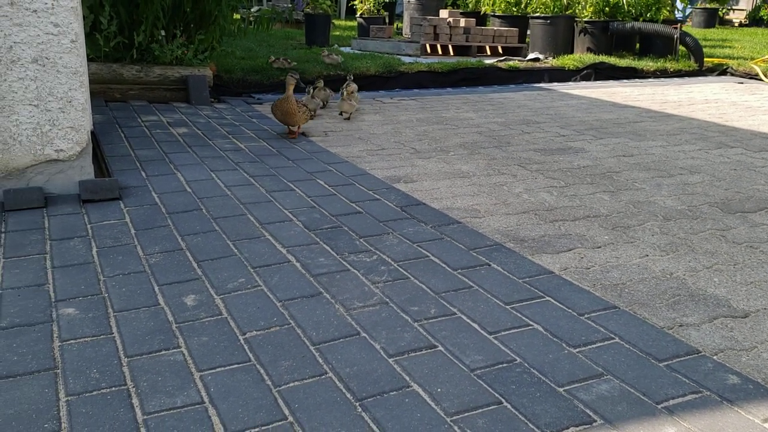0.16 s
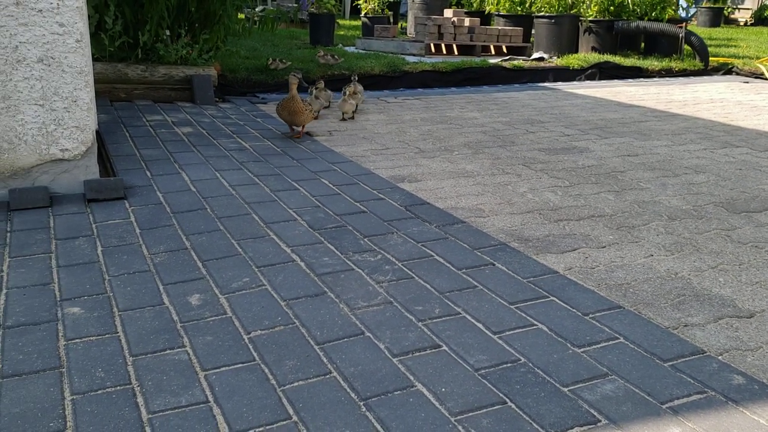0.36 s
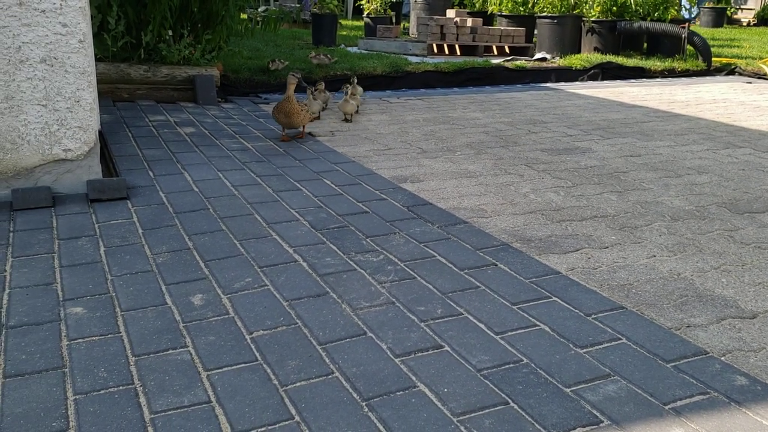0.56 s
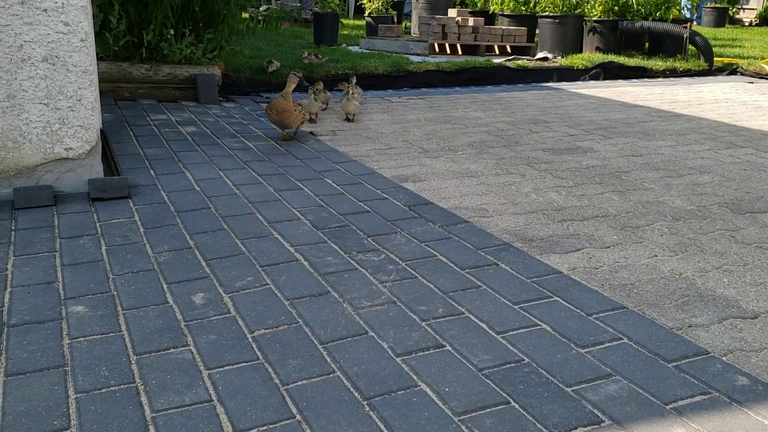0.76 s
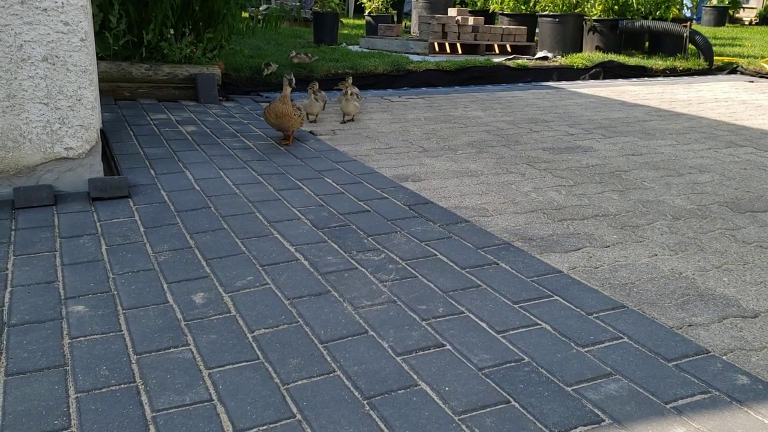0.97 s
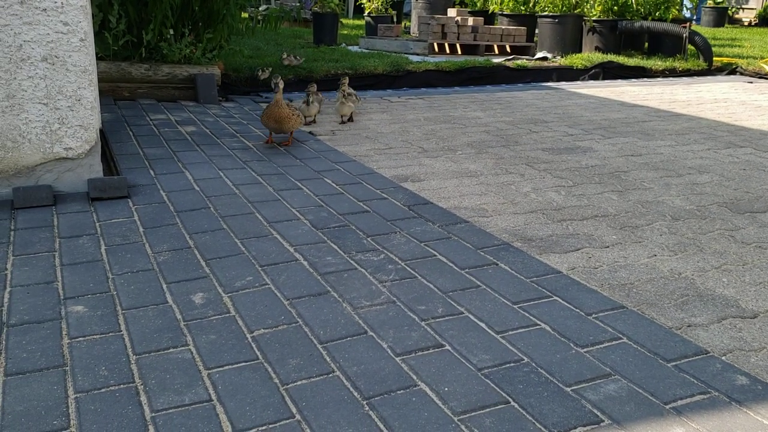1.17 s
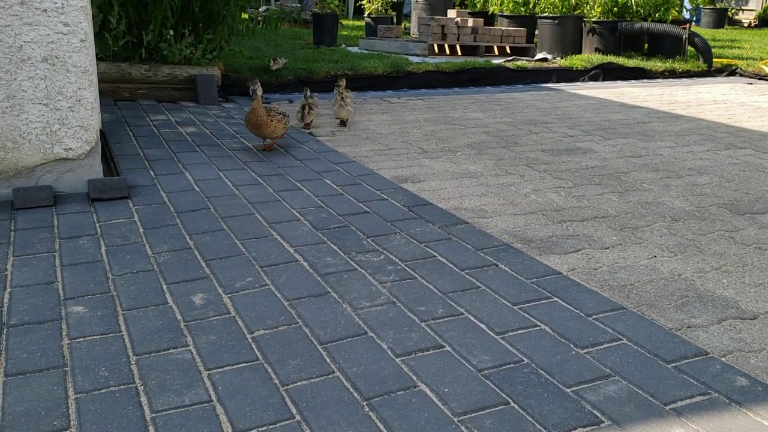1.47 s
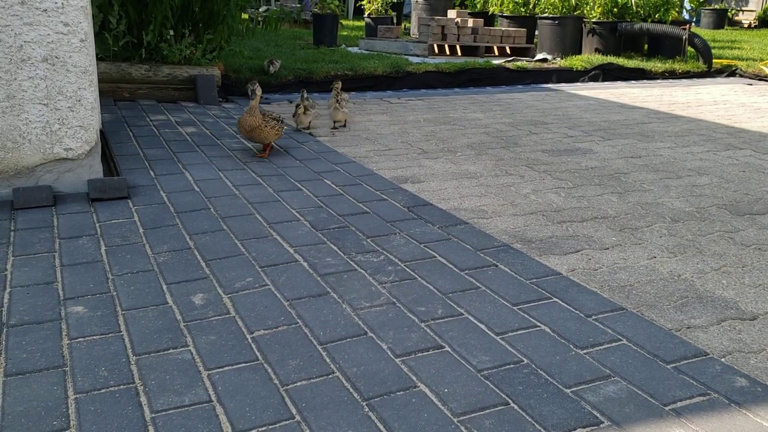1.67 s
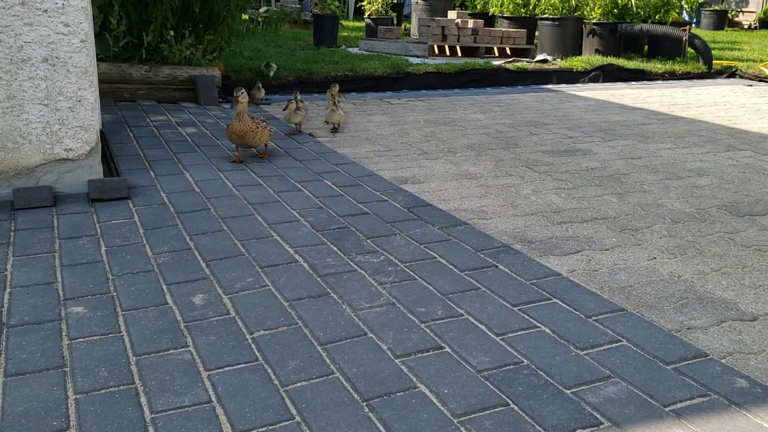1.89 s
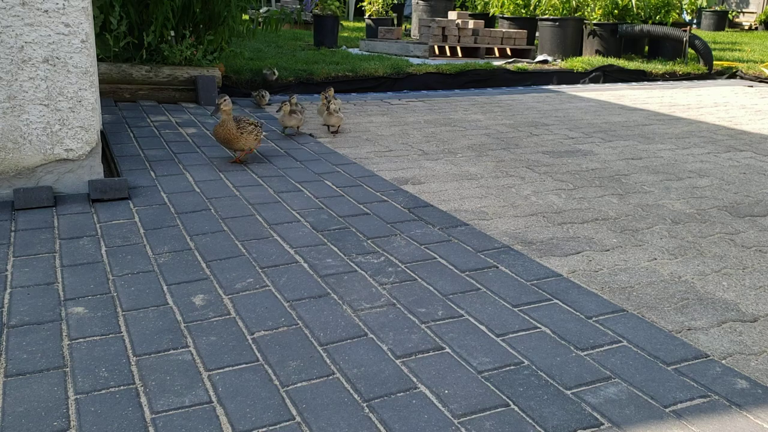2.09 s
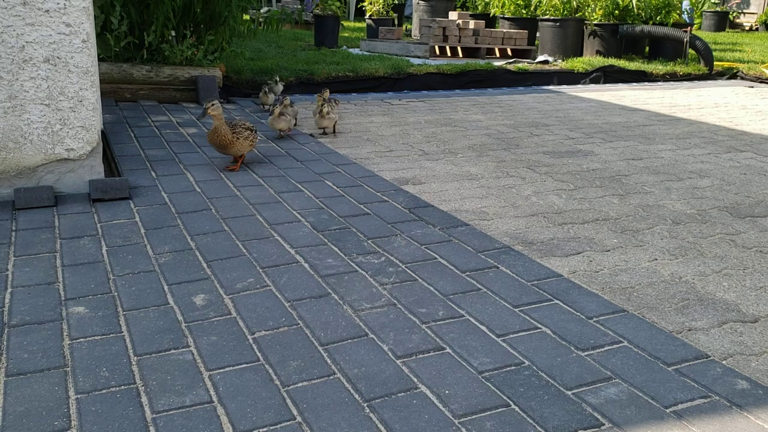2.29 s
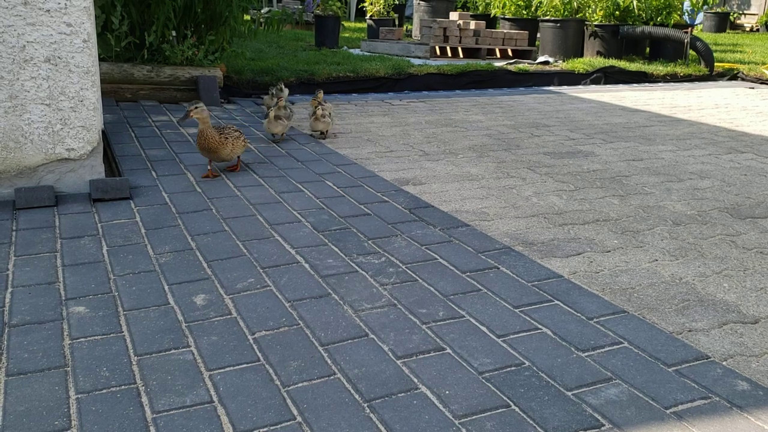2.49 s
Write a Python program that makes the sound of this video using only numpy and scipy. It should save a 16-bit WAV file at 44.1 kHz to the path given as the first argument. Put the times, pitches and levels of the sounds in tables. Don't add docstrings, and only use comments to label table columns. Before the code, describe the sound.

Duckling peeps, short, high and fluttering downward, come at about one and again past two seconds, the second louder, over a steady low machine drone in a paved yard, with faint dry rustling near the phone microphone.

```python
import sys
import numpy as np
from scipy import signal
from scipy.fft import rfft, irfft
from scipy.io import wavfile
from scipy.ndimage import uniform_filter1d

SR = 44100
rng = np.random.default_rng(int(sys.argv[2]) if len(sys.argv) > 2 else 0)


def persist_wave(psi):
    counts = np.round(np.clip(psi, -1, 1) * 32767).astype(np.int16)
    wavfile.write(sys.argv[1], SR, np.atleast_2d(counts).T)


def ratio_of_db(decibels):
    return 10 ** (np.asarray(decibels, float) / 20)


N = 116865


def evened(x):
    return x / np.sqrt(np.mean(x ** 2) + 1e-20)


def read(points, hz):
    f, value = np.transpose(points)
    return np.interp(np.log(hz + 1), np.log(f + 1), value)


def shaped(x, gain):
    return irfft(rfft(x) * gain(np.fft.rfftfreq(N, 1 / SR)), N)


def add(mix, start_s, sound):
    part = mix[..., round(start_s * SR):][..., :sound.shape[-1]]
    part += sound[..., :part.shape[-1]]


def drift(count, size):
    once = uniform_filter1d(rng.standard_normal(count), size)
    return evened(uniform_filter1d(once, size))


def opposed(lean_db):
    return ratio_of_db(lean_db / 2 * np.array([[1], [-1]]))


# (frequency [Hz], correlation [0-1])
PORT_LIKENESS = [(30, .25), (60, .62), (130, .92), (260, .87), (500, .45), (1000, .2), (1700, .2),
                 (3000, .05)]
# (frequency [Hz], left over right [dB])
PORT_LEAN = [(30, 4), (60, 0), (130, -4), (290, 1.4), (640, -9), (1410, 3.4), (3100, 5.5), (15000, 0)]
PORT_LAG_S = .00041


def wide(colour, patchy_db):
    frames, hz = N // 512 + 5, np.fft.rfftfreq(2048, 1 / SR)
    a, b, c, d, patches = rng.standard_normal((frames, 1025, 5)).T
    patches = uniform_filter1d(patches, size=14, axis=0)
    patches = evened(uniform_filter1d(patches, size=6, axis=1))
    same = np.clip(read(PORT_LIKENESS, hz), 0, 1)[:, None]
    right = a + 1j * b
    left = same * right + np.sqrt(1 - same ** 2) * (c + 1j * d)
    left = left * np.exp(2j * np.pi * hz * PORT_LAG_S)[:, None]
    lean = ratio_of_db(read(PORT_LEAN, hz) / 2)[:, None]
    z = np.array([left * lean, right / lean]) * ratio_of_db(patchy_db * patches)
    noise = signal.istft(z, nperseg=2048, noverlap=1536)[1][:, :N]
    return shaped(noise, colour)


# (frequency [Hz], density [dB per Hz])
WASH = [(2400, -10), (3400, -14), (5200, -21.5), (6600, -21.5), (8300, -29), (10000, -23), (12000, -15.5),
        (15600, -14)]


def hiss():
    level_db, low_hz = -71.5, 2400
    return ratio_of_db(level_db) * evened(wide(lambda f: ratio_of_db(read(WASH, f)) * (f >= low_hz), patchy_db=1.6))


# (time [s], level [dB])
LOAD = [(0, -10), (.15, 0), (.4, 0), (.7, 0), (1.0, 1), (1.35, 0), (1.55, 0.5), (1.75, 0.5), (2.0, 0),
        (2.45, 0.72), (2.65, 0)]
# (frequency [Hz], density [dB per Hz])
RUMBLE = [(22, -46), (45, -4.5), (180, -8.5), (300, -15.5), (500, -23), (1150, -28.5), (1350, -33.5),
          (2400, -43.5)]
# (centre [Hz], width [Hz], level [dB])
RESONANCES = [(60.4, 36, -53.5), (109, 9.3, -54), (135, 27, -59), (161, 8.3, -59), (261.7, 10, -62),
              (361.4, 18.6, -60.5), (638.6, 5, -72), (1696, 280, -70.5)]
# (order [multiple of shaft rate], level [dB])
MOTOR_ORDERS = [(8, -75.5), (11, -73), (12, -94.5), (13, -86.5), (14, -81.5), (15, -75.5), (16, -79.5),
                (17, -80), (18, -68.5), (23, -85.5), (25, -75), (26, -84.5), (27, -77.5), (32, -82.5)]


def drone():
    rumble_db, motor_hz, wander = -47.5, 59.36, 0.0009
    panel_follow, all_follow = 6.3, 0.22
    load_db = np.interp(np.arange(N) / SR, *np.transpose(LOAD))
    rumble = wide(lambda f: ratio_of_db(read(RUMBLE, f)) * (f < 2400) * (f > 15), patchy_db=1.7)
    out = ratio_of_db(rumble_db) * evened(rumble)

    base = wide(np.ones_like, patchy_db=3.46)
    for hz, width_hz, db in RESONANCES:
        hump = evened(shaped(base, lambda f: 1 / (1 + ((f - hz) / width_hz * 2) ** 2)))
        out += ratio_of_db(db + panel_follow * load_db * (hz < 150)) * hump

    turns = np.cumsum(motor_hz * (1 + wander * drift(count=N, size=6000))) / SR
    for order, db in MOTOR_ORDERS:
        hz = order * motor_hz
        port_delay = np.array([[0], [hz * PORT_LAG_S]])
        phase = 2 * np.pi * (order * turns + 0.29 * rng.random() - port_delay)
        level = np.sqrt(2) * ratio_of_db(db + 2 * drift(count=N, size=3000))
        out += level * opposed(read(PORT_LEAN, hz)) * np.sin(phase)
    return out * ratio_of_db(all_follow * load_db)


# (time [s], level [dB])
FOOT_TAPS = [
    (.803, -47),
    (2.075, -52),
]
# (frequency [Hz], gain [dB])
FOOT_COLOUR = [(300, -23), (800, 14), (3500, -10.5), (6000, -35)]


def knocks():
    decay_s = 0.0024
    out, t = np.zeros((2, N)), np.arange(600) / SR
    for start_s, db in FOOT_TAPS:
        add(out, start_s, ratio_of_db(db) * rng.standard_normal((2, 600)) * np.exp(-t / decay_s))
    return shaped(out, lambda f: ratio_of_db(read(FOOT_COLOUR, f)))


# (start [s], length [s], level [dB])
STIR_EVENTS = [
    (1.08, 0.17, -84.5),
    (1.332, 0.22, -71),
    (1.615, 0.15, -75),
    (2.195, 0.15, -68.5),
    (2.328, 0.11, -66),
    (2.423, .11, -63),
    (2.518, 0.082, -67),
]
# (time [s], peak [dB], left over right [dB])
TICK_EVENTS = [
    (1.1014, -55, -4),
    (1.2022, -63, 1.5),
    (1.3438, -61, -3.5),
    (1.364, -63, -3),
    (1.4042, -60, -3),
    (1.4306, -58, -4.5),
    (2.4294, -57, -2),
    (2.478, -58, -2),
    (2.535, -58, 0),
    (2.5481, -54, 4),
]
# (frequency [Hz], gain [dB])
DRY_COLOUR = [(4500, -14), (5500, -15.5), (6500, -5), (7300, -21), (8300, -27), (10000, -7.5),
              (13000, -2.5), (15700, -2.5)]


def rustle():
    grains_per_s, spread_db = 2500, 3
    tick_decay_s, tick_db = .0008, 7
    stir, ticks = np.zeros(N), np.zeros((2, N))
    for start_s, length_s, db in STIR_EVENTS:
        u = np.arange(0, length_s, 1 / SR) / length_s
        add(stir, start_s, ratio_of_db(db) * np.interp(u, [0, 0.11, .7, 1], [0.3, 1, 1.0, 0.2]))

    size = ratio_of_db(spread_db * np.minimum(rng.exponential(1, N), 4))
    size = size * (rng.random(N) < grains_per_s / SR)
    size = uniform_filter1d(size, size=40) + 0.12
    grains = evened(shaped(size * rng.standard_normal((2, N)), lambda f: ratio_of_db(read(DRY_COLOUR, f))))

    t = np.arange(600) / SR
    for start_s, db, pan_db in TICK_EVENTS:
        snap = rng.standard_normal(600) * np.exp(-t / tick_decay_s)
        snap = snap / abs(snap).max()
        add(ticks, start_s, ratio_of_db(db + tick_db) * opposed(pan_db) * snap)
    return stir * grains + shaped(ticks, lambda f: ratio_of_db(.7 * read(DRY_COLOUR, f)))


# (frequency [Hz], left over right [dB])
PEEP_LEAN = [(2400, 4.5), (3200, 1.5), (3900, 7)]


def yard(x):
    t60_s, tail_db = 0.26, -0.5
    slap_s, slap_width_s, slap_db = .1, 0.032, -20
    early_s, early_db = .02, -4
    t = np.arange(SR) / SR
    taps = np.zeros((2, SR))
    at = np.arange(100, SR - 20, 20) + rng.integers(0, 20, (2, (SR - 101) // 20))
    np.put_along_axis(taps, at, rng.choice([-1., 1.], at.shape), 1)
    response = taps * ratio_of_db(-60 * t / t60_s)
    response *= ratio_of_db(tail_db) / np.linalg.norm(response[0])
    slap = taps * np.exp(-((t - slap_s) / slap_width_s) ** 2)
    response += slap * ratio_of_db(slap_db) / np.linalg.norm(slap[0])
    for place in rng.random((7, 3)):
        arrival = (40 + early_s * SR * place[:2]).astype(int)
        response[[0, 1], arrival] += ratio_of_db(early_db - 6 * place[2])
    response[:, 0] += 1
    wet = signal.fftconvolve(x[None], response, axes=1)[:, :N]
    return shaped(wet, lambda f: ratio_of_db(-6) * opposed(read(PEEP_LEAN, f)))


def chip(length_s, db, first_hz, last_hz):
    warble_hz = 90
    u = np.arange(0, length_s, 1 / SR) / length_s
    hz = first_hz + (last_hz - first_hz) * u + warble_hz * drift(count=6000, size=60)[:len(u)]
    return ratio_of_db(db) * 2 * np.sin(np.pi * u) * np.sin(2 * np.pi * np.cumsum(hz) / SR)


PEEP_PITCH = [(0, .97, .97), (.15, 1, 1), (.32, .96, .96), (.45, .845, .9), (.8, .79, .79), (1, .6, .6)]
# (share of the peep [0-1], level when stepped [dB], when even [dB])
PEEP_EFFORT = [(0, -22, -22), (.26, -4, -4), (.38, -11, -4), (.52, 0, -1), (.76, -4, 0), (.86, -12, -7),
               (1, -15, -13)]


def peep(length_s, db, top_hz, slide):
    rise_s, fall_s = .015, 0.002
    flutter_hz, flutter_drift, flutter_dip = 123.25, .2, 0.84
    start_swing_hz, stepped_swing_hz, even_swing_hz = 300, 170, 320
    t = np.arange(0, length_s, 1 / SR)
    u, slide = t / length_s, np.clip(slide, 0, 1)

    def course(table):
        share, stepped, even = np.transpose(table)
        return (1 - slide) * np.interp(u, share, stepped) + slide * np.interp(u, share, even)

    rate_hz = flutter_hz * (1 + flutter_drift * drift(count=6000, size=150)[:len(t)])
    flutter = 2 * np.pi * np.cumsum(rate_hz) / SR
    late_swing_hz = stepped_swing_hz + slide * (even_swing_hz - stepped_swing_hz)
    swing_hz = np.interp(u, [.25, .5], [start_swing_hz, late_swing_hz])
    hz = top_hz * course(PEEP_PITCH) + swing_hz * np.sin(flutter)
    effort = ratio_of_db(db + course(PEEP_EFFORT)) * np.minimum(t / rise_s, 1)
    effort *= np.minimum((length_s - t) / fall_s, 1)
    effort *= 1 + flutter_dip * np.cos(flutter + .5)
    return np.sqrt(2) * effort * np.sin(2 * np.pi * np.cumsum(hz) / SR)


# (start [s], length [s], level [dB], first pitch [Hz], slide [0 stepped - 1 even])
PEEP_EVENTS = [
    (1.163, .104, -52.5, 3916, 0.74),
    (2.315, .104, -47, 3888, 0.14),
]
# (start [s], length [s], level [dB], first pitch [Hz], last pitch [Hz])
CHIP_EVENTS = [
    (.685, .03, -91, 5050, 5200),
    (.71, .07, -88, 3220, 3180),
    (1.5, .04, -90, 5950, 5850),
    (1.548, .03, -75, 3030, 2980),
    (2.068, .03, -87, 3620, 3580),
    (2.19, .05, -90, 4800, 5050),
]


def scene():
    peeps, chips = np.zeros((2, N))
    for start_s, *row in PEEP_EVENTS:
        add(peeps, start_s, peep(*row))
    for start_s, *row in CHIP_EVENTS:
        add(chips, start_s, chip(*row))
    birds = yard(peeps + 0.9 * chips) + chips
    return birds + drone() + hiss() + rustle() + knocks()


def roll_off(x):
    return signal.sosfilt(signal.butter(12, 15700, fs=SR, output="sos"), x)


def record(dry):
    edge_hz = 15730
    mix = shaped(dry, lambda f: f < edge_hz)
    return roll_off(mix)


dry = scene()
out = record(dry)
persist_wave(out)
```